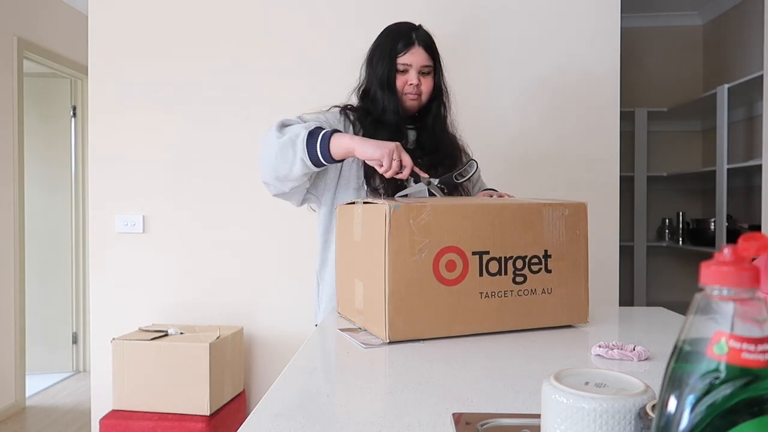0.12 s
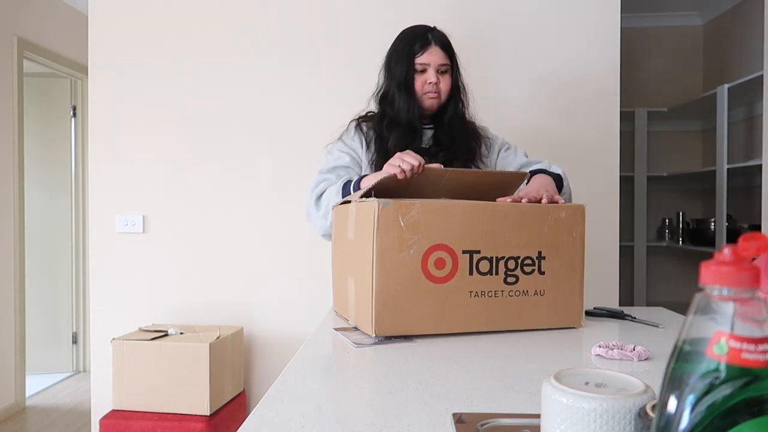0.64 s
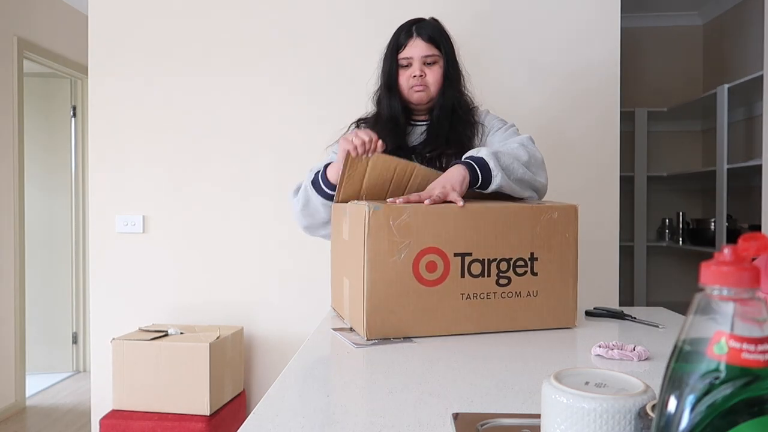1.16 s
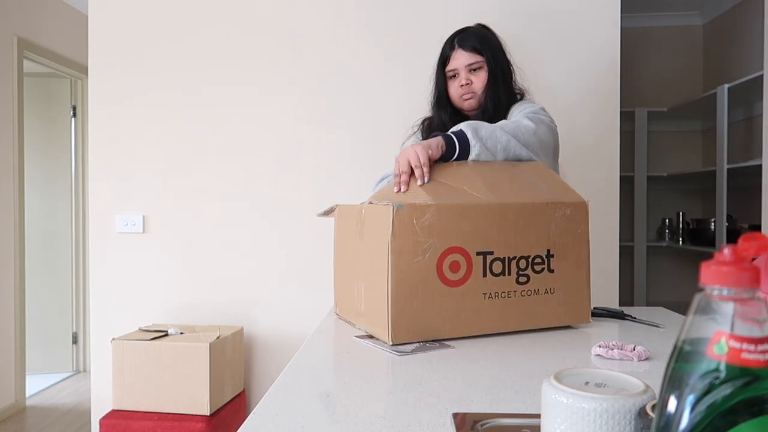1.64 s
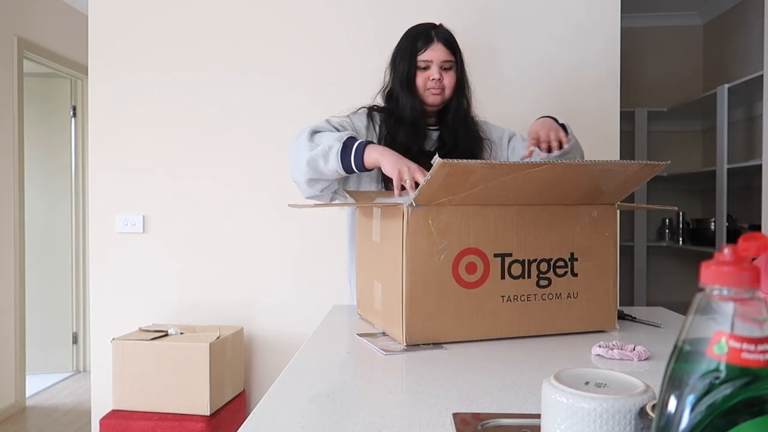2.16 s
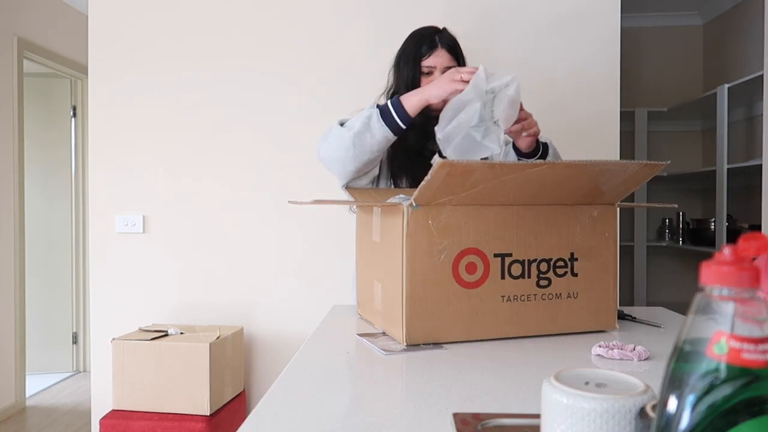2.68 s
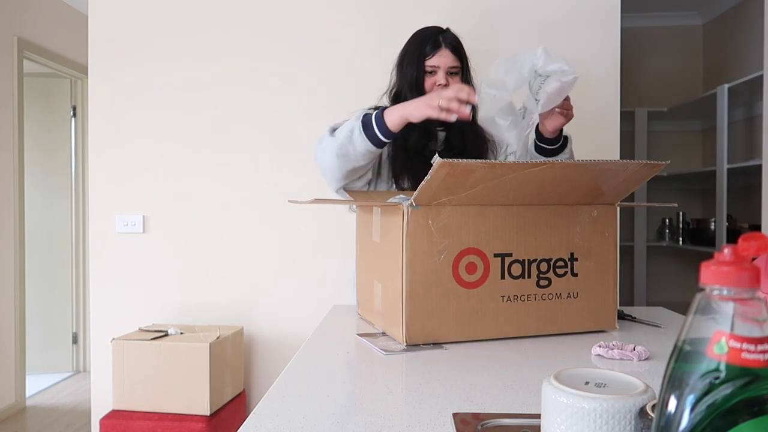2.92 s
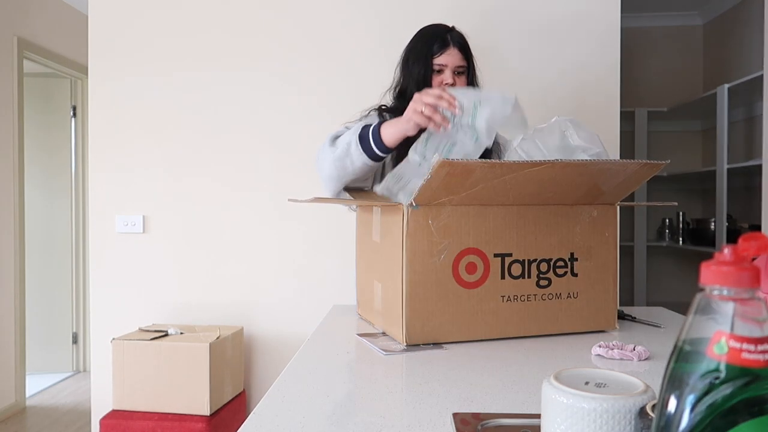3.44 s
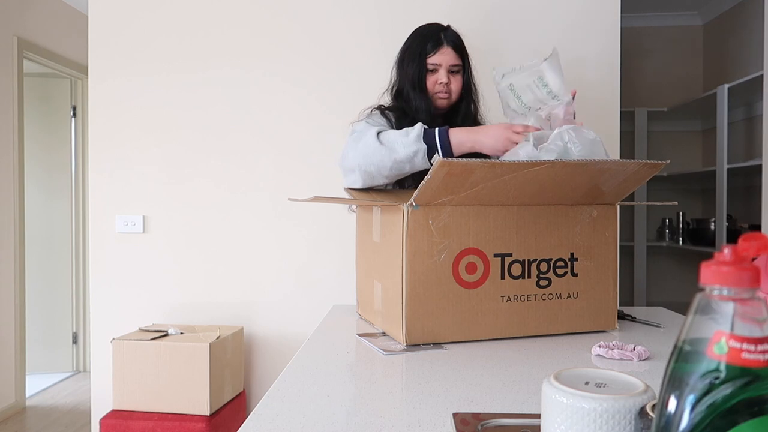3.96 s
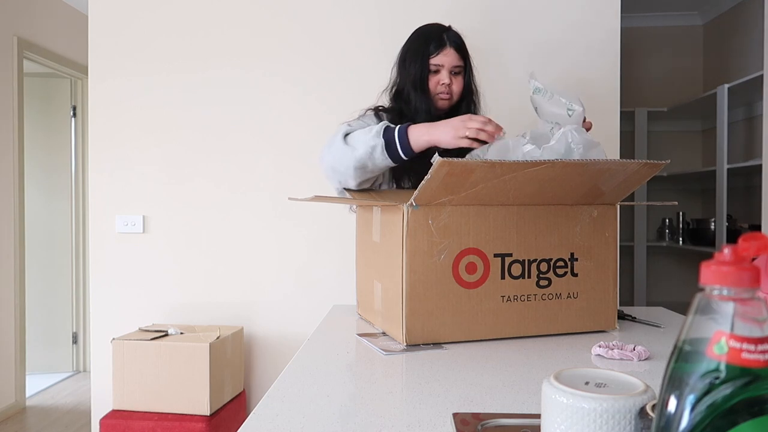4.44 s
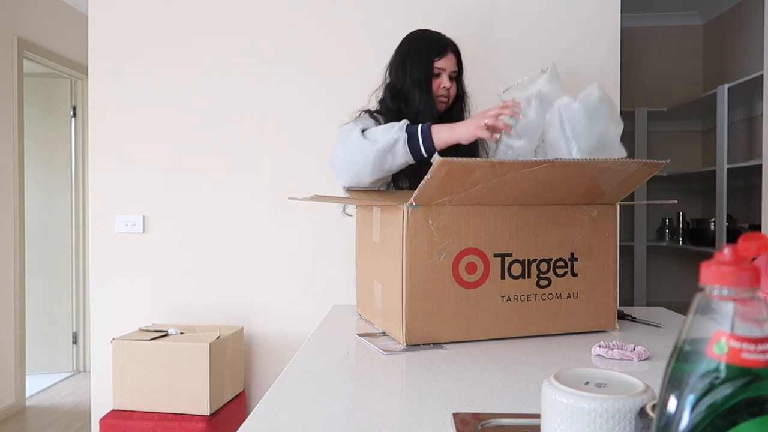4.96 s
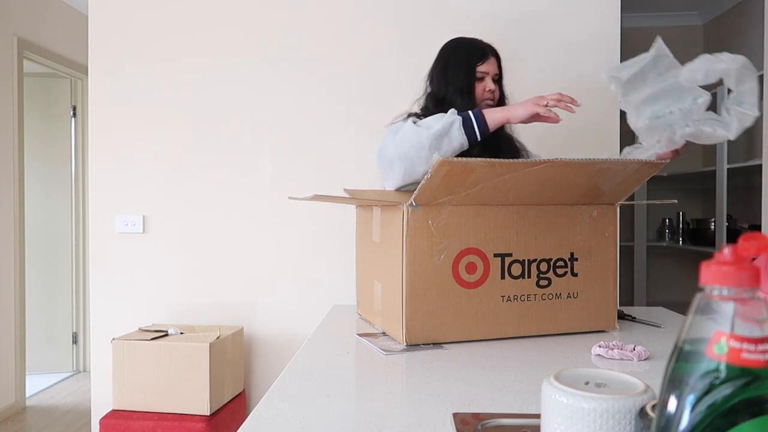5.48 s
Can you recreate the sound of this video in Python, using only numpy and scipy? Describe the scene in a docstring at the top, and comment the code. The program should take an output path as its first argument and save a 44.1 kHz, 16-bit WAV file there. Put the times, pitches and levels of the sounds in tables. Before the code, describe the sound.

First come cardboard scuffs and hollow bumps, then sharp snaps, a fluttering hollow flap whoomp, a brief creak and the loudest crack. A quick cut leads to crackly plastic film squeezed and dragged against the box in separate bursts, with a few knocks. Narrow stereo camera microphones in a reflective kitchen, with quiet steady room air underneath.

```python
"""Hands scuff and grip a cardboard box on a kitchen counter over the steady hush of the house.
It is cut and pulled open: tape snaps, walls knock, the flap swings and creaks; then plastic air pillows rustle out.
Snaps are noise bursts on ringing wall modes, the creak is a slip train, rustles are crackles shaped by strokes.
Hard walls answer; a camera with two microphone ports close together rounds off the loudest peaks."""
import sys
import numpy as np
from scipy import signal
from scipy.fft import rfft, irfft, next_fast_len
from scipy.io import wavfile
from scipy.ndimage import map_coordinates

SR = 44100
rng = np.random.default_rng(int(sys.argv[2]) if len(sys.argv) > 2 else 0)


def voltage_ratio(level):
    """Linear amplitude factor for a level in decibels (scalar or array-like)."""
    return 10 ** (np.asarray(level, float) / 20)


def dump(signal):
    """Clip the signal to [-1, 1] and save it as 16-bit WAV at the path in sys.argv[1]."""
    limited = np.clip(np.atleast_2d(signal).T, -1, 1)
    pcm = np.round(limited * 32767).astype(np.int16)
    wavfile.write(sys.argv[1], SR, pcm)


N = 246563

# two shots are joined here: the earlier sounds stop, the level dips briefly
SPLICE_S, SPLICE_DIP_S, SPLICE_DB = 2.1165, 0.003, -16


def unit(x):
    """Scaled to rms 1."""
    return x / np.sqrt(np.mean(x ** 2) + 1e-20)


def along(points, hz):
    """Reads a curve of (Hz, value) rows on a log frequency axis."""
    f, v = np.transpose(points)
    return np.interp(np.log(hz + 1), np.log(f + 1), v)


def curves(rows):
    """One value per sample for each column, and a gate that is open inside the table's span."""
    s, *cols = np.transpose(rows)
    t = np.arange(N) / SR
    gate = np.clip(np.minimum(t - s[0], s[-1] - t) / 0.004 + 0.5, 0, 1)
    return [np.interp(t, s, c) for c in cols] + [gate]


def wobble(rate):
    """A smooth random curve, rate knots a second."""
    knots = rng.standard_normal(int(N * rate / SR) + 4)
    return map_coordinates(knots, [np.arange(N) * rate / SR])


def filtered(x, response):
    """x through a complex response of frequency."""
    n = x.shape[-1]
    m = next_fast_len(n + 8192)
    return irfft(rfft(x, m) * response(np.fft.rfftfreq(m, 1 / SR)), m)[..., :n]


def resonance(f, hz, width):
    """A causal peak of height 1."""
    return 1j * f * width / (hz * hz - f * f + 1j * f * width)


def strokes(rows):
    """Gain over time: each stroke rises, holds and fades within its own shot; their powers add."""
    t = np.arange(N) / SR
    power = np.zeros(N)
    for s, hold, db, rise, fade in rows:
        same_shot = (s > SPLICE_S) == (t > SPLICE_S)
        before, after = np.clip(s - t, 0, None), np.clip(t - s - hold, 0, None)
        power += same_shot * voltage_ratio(db - rise * before - fade * after) ** 2
    return np.sqrt(power)


# Likeness of the two microphone ports. Each row: frequency in Hz, left-right correlation.
PORT_LIKENESS = [(100, 0.99), (400, 0.94), (1500, 1), (3000, 0.94), (6000, 0.18), (12000, 1)]


def ports(pair):
    """Two unrelated signals become left and right of the given likeness, by mixing a mid and a side."""
    def turn(hz):
        return np.arccos(np.clip(along(PORT_LIKENESS, hz), -1, 1)) / 2
    mid, side = filtered(pair, lambda hz: np.array([np.cos(turn(hz)), np.sin(turn(hz))]))
    return np.array([mid + side, mid - side])


# Decay of the kitchen. Each row: frequency in Hz, decay time t60 in seconds, relative starting level in dB.
KITCHEN_DECAY = [(100, 0.43, -6), (298, 0.64, 2.5), (700, 0.43, -5), (1470, 0.57, 0), (3480, 0.64, -5),
                 (11100, 0.17, 4.5)]


def kitchen(x, wet_db):
    """Direct sound plus a tail in which each frequency dies at its own speed."""
    step, wet = SR // 4, np.zeros((2, len(x) + SR))
    band_hz, t60, db = np.transpose(KITCHEN_DECAY)
    for start in range(0, len(x), step):  # the source moves, so each quarter second draws a new tail
        if not x[start:start + step].any():
            continue
        hz, t, z = signal.stft(rng.standard_normal((2, SR // 2)), SR, nperseg=256)
        start_db = along(np.transpose([band_hz, db]), hz)[:, None]
        hz_t60 = along(np.transpose([band_hz, t60]), hz)[:, None]
        tail = signal.istft(z * voltage_ratio(start_db - 60 * t / hz_t60), SR, nperseg=256)[1]
        tail = tail * (1 - np.exp(-np.arange(tail.shape[1]) / (0.00032 * SR)))  # soft onset
        tail = tail / np.linalg.norm(tail[0])
        part = signal.fftconvolve(x[None, start:start + step], tail, axes=1)
        wet[:, start:start + part.shape[1]] += part
    return x + voltage_ratio(wet_db) * ports(wet[:, :len(x)])


def crackle(per_second, spread_db, clump_db, hiss_db):
    """Tiny buckling clicks of uneven size, clumped in time, on a hiss; small creases ring high, large ones low."""
    crease_hz = 450 * 2 ** np.arange(0, 5.5, 0.5)[:, None]
    shape = (len(crease_hz), N)
    struck = rng.random(shape) < per_second / SR  # the rate holds for each crease size
    clicks = struck * voltage_ratio(spread_db * rng.exponential(size=shape)) * rng.standard_normal(shape)
    grains = filtered(clicks, lambda f: resonance(f, crease_hz, 0.4 * crease_hz)).sum(axis=0)
    stream = unit(grains) + voltage_ratio(hiss_db) * rng.standard_normal(N)
    return unit(stream * voltage_ratio(clump_db * (wobble(23.62) + wobble(70))))


def rustle(gain, colour, stream, wet_db):
    """Crackle in a material's colour, heard in the kitchen."""
    coloured = unit(filtered(stream, lambda hz: voltage_ratio(along(colour, hz))))
    return kitchen(gain * coloured, wet_db)


# Colour of the hush. Each row: frequency in Hz, relative density in dB per Hz.
AIR_COLOUR = [(15, -37), (25, 0), (113, 3.5), (183, -5.5), (281, 1), (537, -8.5), (945, -3.5), (2700, -1),
              (9810, -19.5), (10900, -22), (15500, -29)]
AIR_DB = -46.5  # rms


def air():
    """The steady hush of the house: coloured noise at both ports."""
    hush = filtered(rng.standard_normal((2, N)), lambda hz: voltage_ratio(along(AIR_COLOUR, hz)))
    return voltage_ratio(AIR_DB) * unit(ports(hush))


# Hands gripping and shifting the box. Each row: start in seconds, hold in seconds, direct level in dB,
# rise in dB per second, fade in dB per second.
GRIP_STROKES = [(0, 0.0098, -30, 250, 102), (.25, 0.023, -37.5, 97, 45), (.68, .01, -30, 398, 63),
                (1.1, 0.67, -47, 50, 30), (1.79, 0.022, -30, 1500, 78), (3.175, 0.019, -34.5, 1500, 100),
                (3.75, 0.18, -51.5, 45, 50), (4.77, 0.082, -49, 209, 118)]
# Colour of the box walls. Each row: frequency in Hz, relative density in dB per Hz.
WALL_COLOUR = [(55, -40), (90, -16), (165, -0.5), (215, -1), (300, -1), (420, -5), (600, -5), (1000, -9.5),
               (2000, -39)]
# wall rumble under a -30.5 dB squeeze; an exponent above 1: firm squeezes press the walls more
PILLOWS_ON_WALLS_DB, PRESS_GROWS = -42, 1.34


def handling(squeezing):
    """Grips, and pillows dragged along the walls, keep the box murmuring."""
    dragged = voltage_ratio(PILLOWS_ON_WALLS_DB) * (squeezing / voltage_ratio(-30.5)) ** PRESS_GROWS
    stream = crackle(per_second=150, spread_db=1.5, clump_db=-1.5, hiss_db=4.5)
    return rustle(np.hypot(strokes(GRIP_STROKES), dragged), WALL_COLOUR, stream, wet_db=-1.5)


# Blade and fingers on cardboard. Each row: start in seconds, hold in seconds, direct level in dB,
# rise in dB per second, fade in dB per second.
SCUFF_STROKES = [(0, .01, -33.5, 200, 49), (.155, 0.0059, -26, 900, 225), (.48, 0.026, -37, 198, 215),
                 (.98, 0.055, -42.5, 210, 182), (1.2, 0.031, -28, 317, 104), (1.55, 0.045, -30, 140, 91),
                 (1.9, 0.047, -38, 100, 56), (3.16, .03, -34.5, 1493, 130)]
# Colour of cardboard. Each row: frequency in Hz, relative density in dB per Hz.
CARD_COLOUR = [(290, -28), (500, -12), (800, -10), (1300, -9), (2700, -15), (3600, -21.5), (5500, -24.5),
               (10000, -36.5), (15500, -47)]


def scuffs():
    """Blade and fingers scuff the card: a crackle under a stronger hiss."""
    stream = crackle(per_second=340, spread_db=2.0, clump_db=2.0, hiss_db=3.0)
    return rustle(strokes(SCUFF_STROKES), CARD_COLOUR, stream, wet_db=-4.5)


# Snaps and knocks. Each row: start in seconds, crack peak in dB before mixing, box peak in dB before mixing,
# frequency of the struck spot in Hz, shudder t60 in seconds.
BLOW_EVENTS = [(0.1431, -16.5, -9.5, 218, 0.25), (.172, -21, -18, 210, 0.12),
               (0.4742, -40, -25.5, 228, 0.43), (0.6386, -8, -7, 504, 0.077), (.644, -12, -7.5, 177, 0.023),
               (.660, -8, -7.5, 214, 0.037), (0.978, -24, -31, 374, 0.32), (1.149, -6.5, -14.5, 364, 0.019),
               (1.1524, -2.5, -10.5, 450, 0.014), (1.1579, 0.5, -43, 426, .04),
               (1.1613, -4, -17, 490, 0.14), (1.418, -62, -22.5, 199, 0.019),
               (1.546, -47, -28.5, 79.5, 0.065), (1.5804, -8, -47, 660, .04),
               (1.5878, -11, -22.5, 670, .08), (1.7699, 4, -27, 700, 0.01), (1.7701, 2, 2, 655, .01),
               (1.779, -24, -9.5, 290, 0.07), (2.251, -12.5, -25.5, 360, 0.045),
               (2.626, -13, -27.5, 370, 0.047), (3.1555, -24, -9.5, 407, 0.017),
               (3.163, -20, -23, 700, .08), (3.172, -35, -17, 183, 0.06), (3.186, -37, -16, 380, 0.035),
               (3.213, -40, -18.5, 268, 0.038)]
# Modes of walls and cavity. Each row: frequency in Hz, relative level in dB, decay time t60 in seconds.
BOX_MODES = [(67, -1.5, 0.011), (134.3, 1.5, 0.042), (158, -1.5, 0.052), (199, 4, 0.037), (300, 4.5, 0.016),
             (346, -1.5, 0.071), (422, -9, 0.06), (547, 4, 0.025), (623, 6, 0.023), (774, 5, 0.02),
             (884, -7, 0.067), (1068, -7, 0.025), (1403, -7.5, 0.026)]
CRACK_HZ, CRACK_T60_S = 2030, 0.015  # lowest crack pitch (higher on tighter spots), and its length


def box_walls(t, box_hz, dull_db):
    """Decaying modes, strongest near the struck pitch; each blow excites them a little differently."""
    strength_db = rng.normal(0, 2, len(BOX_MODES))
    walls = np.zeros(len(t))
    for k, (hz, level, t60) in enumerate(BOX_MODES):
        octaves = np.log2(hz / box_hz)
        db = level + strength_db[k] - 0.93 * abs(octaves) - dull_db * max(octaves, 0)
        walls += (-1) ** k * voltage_ratio(db - 60 * t / t60) * np.sin(2 * np.pi * hz * t)
    return walls


def blows():
    """Each snap is a short crack; the struck spot thuds at its own pitch and shakes the box walls."""
    out, t = np.zeros((2, N + SR)), np.arange(SR // 2) / SR
    for s, db, box_db, box_hz, shudder in BLOW_EVENTS:
        noise = rng.standard_normal((2, len(t)))
        snap = noise[0] * voltage_ratio(-60 * t / CRACK_T60_S)  # ragged tearing after the first break
        snap[0] = 1
        snap_hz = CRACK_HZ * max(box_hz / 460, 1) ** 0.8
        crack, smooth = filtered(np.array([snap, t == 0]),
                                 lambda f: resonance(f, snap_hz, 1230) / (1 + 1j * f / 9000) ** 2)
        # a blow with little crack is soft and misses the high modes
        dull_db = 1.5 + 0.11 * max(box_db - db, 0)
        walls = box_walls(t, box_hz, dull_db)
        spot = 2.16 * voltage_ratio(-60 * t * box_hz / 11) * np.sin(2 * np.pi * box_hz * t)  # dies in a few cycles
        push = 0.081 * noise[1] * voltage_ratio(-60 * t / max(shudder, 0.005))  # the blow goes on as a dying shudder
        push[0] = 1
        walls, spot = signal.fftconvolve(push[None], [walls, spot], axes=1)[:, :len(t)]
        scale = voltage_ratio(box_db) / np.abs(walls + spot).max()
        crack = voltage_ratio(db) * crack / np.abs(crack).max()
        # the many paths to the walls even out the crack's colour
        smooth = smooth * np.linalg.norm(crack) / np.linalg.norm(smooth)
        # the struck panel beams crack and thud forward and feeds the room little
        to_room = 0.89 * smooth + scale * (walls + 0.18 * spot)
        beamed = 0.55 * (crack - smooth) + 0.22 * crack + 1.06 * scale * spot
        heard = kitchen(to_room, wet_db=-2.5) + beamed
        if s < SPLICE_S:
            heard[:, round((SPLICE_S - s) * SR):] = 0
        out[:, round(s * SR):][:, :len(t)] += heard
    return out[:, :N]


# Air in the box as the flap swings open. Each row: time in seconds, mean cavity frequency in Hz, level in dB.
CAVITY_PATH = [(.68, 200, -34), (.705, 240, -17), (.716, 270, -26), (.73, 320, -17), (.742, 335, -26),
               (.756, 350, -17), (.766, 330, -42), (.79, 255, -25), (.815, 250, -38), (.855, 285, -31),
               (.915, 290, -44)]


def cavity():
    """The air resonance glides, fluttering, as the flap swings open: a wavering sine."""
    hz, db, gate = curves(CAVITY_PATH)
    phase = 2 * np.pi * np.cumsum(hz * (1 + 0.06 * wobble(120))) / SR
    tone = np.sin(phase) * voltage_ratio(2 * wobble(70))
    return kitchen(gate * voltage_ratio(db) * unit(tone), wet_db=-15)


# Tape peeling in stick and slip. Each row: time in seconds, typical slips a second in Hz, level in dB,
# unevenness of the slips from 0 to 1.
CREAK_PATH = [(1.441, 610, -26, 0.02), (1.456, 650, -16, 0.04), (1.463, 700, -20, .08),
              (1.469, 790, -15, 0.03), (1.479, 830, -17, .02), (1.497, 750, -16.5, .06),
              (1.512, 630, -19, .1), (1.528, 602, -25, .3), (1.54, 700, -17, 0.07), (1.55, 724, -20, .1),
              (1.558, 700, -25, .3), (1.578, 680, -29, 0.35)]
# Flap resonances that the creak drives. Each row: frequency in Hz, width in Hz, relative level in dB.
FLAP_MODES = [(720, 260, 4), (1300, 200, -6), (1650, 260, -5), (2480, 220, -2), (3300, 400, -14)]


def flap(f):
    """Resonances of the flap, alternating in sign; card is dull up top."""
    modes = sum((-1) ** k * voltage_ratio(db) * resonance(f, hz, width)
                for k, (hz, width, db) in enumerate(FLAP_MODES))
    return modes / (1 + 1j * f / 4000) ** 2


def creak():
    """Slips of the tape ring the flap; the more uneven they come, the more the squeak breaks into scrape."""
    hz, db, uneven, gate = curves(CREAK_PATH)
    cycles = np.cumsum(hz * np.exp(uneven * wobble(400))) / SR
    slips = np.diff(np.floor(cycles), prepend=0)  # one impulse a cycle
    slips = unit(slips * voltage_ratio(1.5 * wobble(130) + 3 * rng.standard_normal(N)))
    scrape = (0.15 + 2.5 * uneven) * rng.standard_normal(N)
    return kitchen(gate * voltage_ratio(db) * unit(filtered(slips + scrape, flap)), wet_db=-8)


# Handfuls of air pillows squeezed. Each row: start in seconds, hold in seconds, direct level in dB,
# rise in dB per second, fade in dB per second.
SQUEEZE_STROKES = [(2.135, 0.095, -34.5, 800, 39), (2.245, 0.0086, -27.5, 252, 129),
                   (2.4, 0.24, -30.5, 76, 60), (2.625, 0.0092, -34, 300, 60), (2.832, .006, -38, 400, 300),
                   (3.17, 0.0087, -31.5, 1200, 44), (3.39, 0.027, -28.5, 110, 157.5),
                   (3.5, 0.082, -37, 203, 75), (3.71, 0.037, -38, 102, 200), (3.83, 0.22, -36, 80, 60),
                   (4.105, 0.13, -32.5, 500, 52), (4.345, 0.025, -33, 120, 85),
                   (4.54, 0.0098, -35, 151, 43), (4.775, 0.076, -27, 111, 120), (5.0, 0.32, -37, 103, 83),
                   (5.46, 0.14, -39.5, 96, 52)]


def squeezes():
    """Gain of the squeezing hands, which moves both the film and the box walls."""
    return strokes(SQUEEZE_STROKES)


# Colour of plastic film. Each row: frequency in Hz, relative density in dB per Hz.
FILM_COLOUR = [(240, -29), (400, -6.5), (653, -3.5), (1000, -4.5), (1880, -1), (3740, -3.5), (9950, -16.5),
               (13700, -21), (15500, -24)]


def pillows(squeezing):
    """Plastic film buckles under the hands: dense clicks, little hiss."""
    stream = crackle(per_second=600, spread_db=1.7, clump_db=0.8, hiss_db=-5)
    return rustle(squeezing, FILM_COLOUR, stream, wet_db=-1)


def scene():
    """Everything on the counter, in the kitchen."""
    squeezing = squeezes()
    moving = handling(squeezing) + scuffs() + blows() + cavity() + creak() + pillows(squeezing)
    # the moving sounds carry no deep bass
    return filtered(moving, lambda f: (1j * f / (45 + 1j * f)) ** 3) + air()


# Phase between the microphone ports. Each row: frequency in Hz, lead of left over right in radians.
PORT_LEAD = [(100, -.03), (2500, -.12), (4300, -.55), (7000, -1.3), (11000, -1.9), (15400, -2.2)]


def port_delay(x):
    """Treble reaches the right port first: half the phase lead goes to each side."""
    halves = np.array([[0.5], [-0.5]])
    return filtered(x, lambda hz: np.exp(1j * along(PORT_LEAD, hz) * halves))


def roll_off(x):
    """The treble ends steeply here."""
    return signal.sosfilt(signal.butter(12, 15840, fs=SR, output="sos"), x)


def record(dry):
    """The camera's two ports: phase lead, slight imbalance, rounded clipping, and the dip at the join."""
    x = port_delay(dry)
    x = x * voltage_ratio(np.array([[-0.2], [0.2]]))  # left, right in dB
    x = x / (1 + np.abs(x / 1.02) ** 16) ** (1 / 16)  # clips with a rounded knee
    from_join = (np.arange(N) / SR - SPLICE_S) / SPLICE_DIP_S
    x = x * voltage_ratio(SPLICE_DB * np.exp(-from_join ** 2))
    return roll_off(x)


dry = scene()
out = record(dry)
dump(out)
```